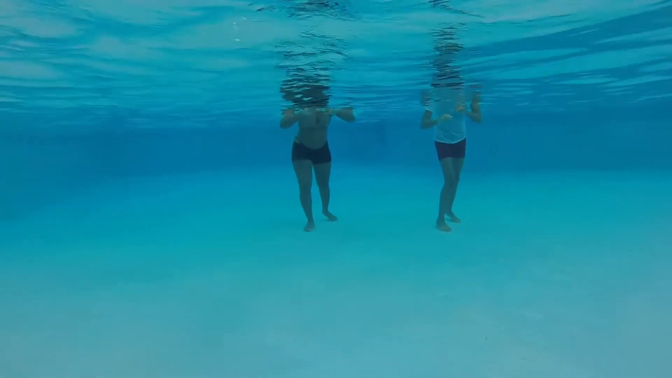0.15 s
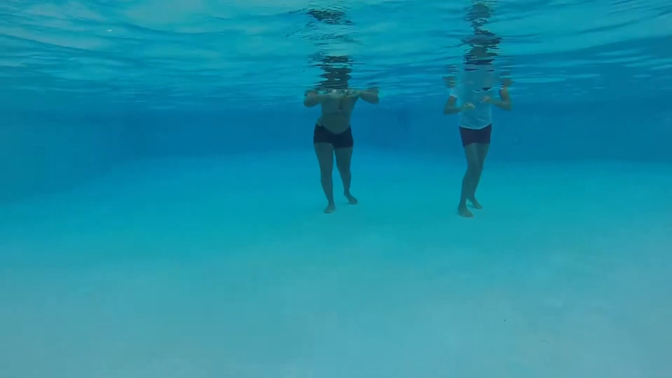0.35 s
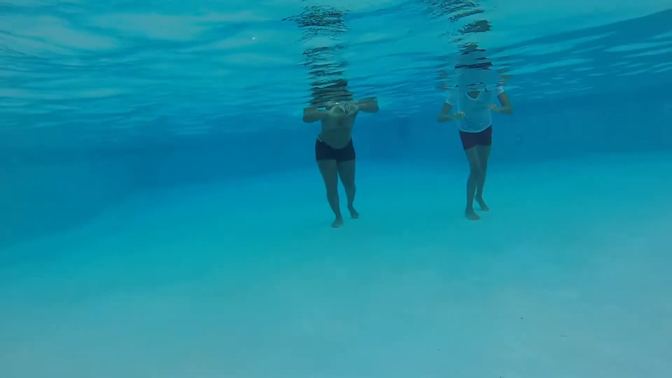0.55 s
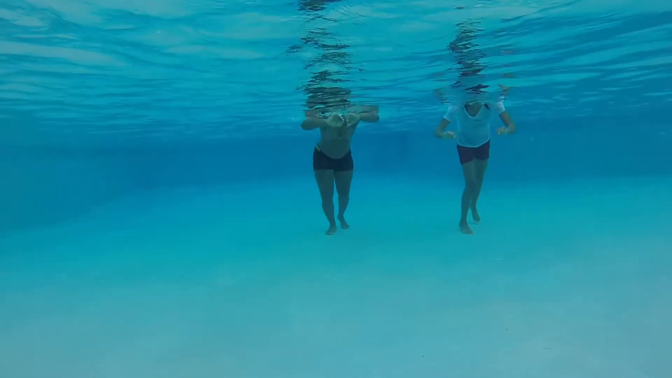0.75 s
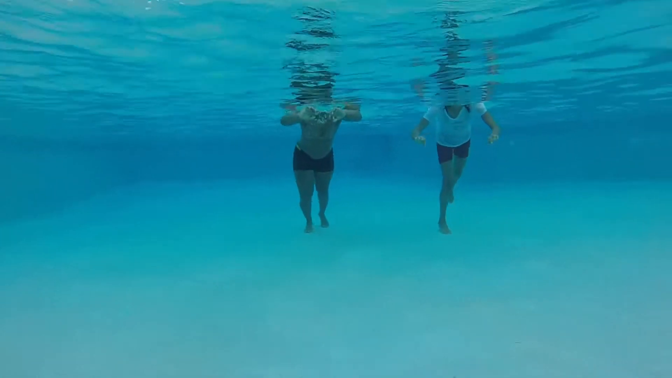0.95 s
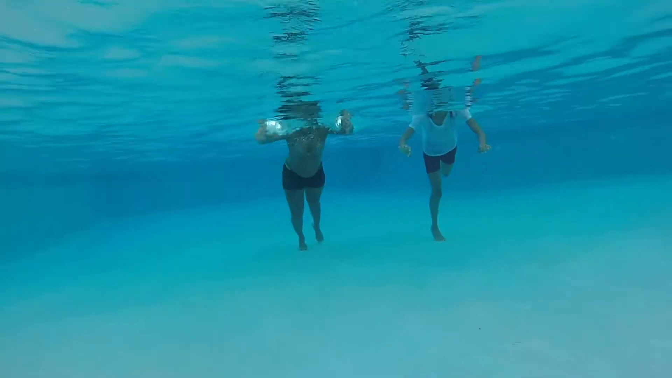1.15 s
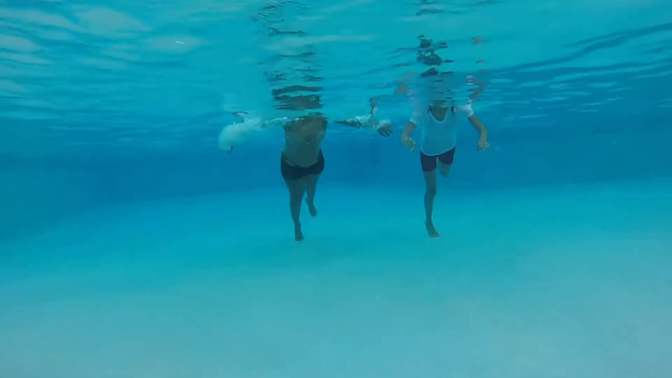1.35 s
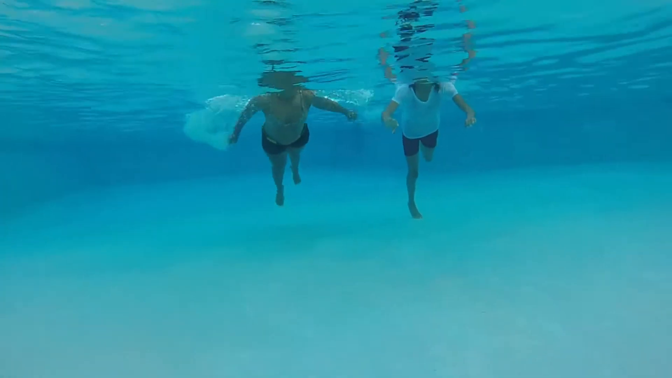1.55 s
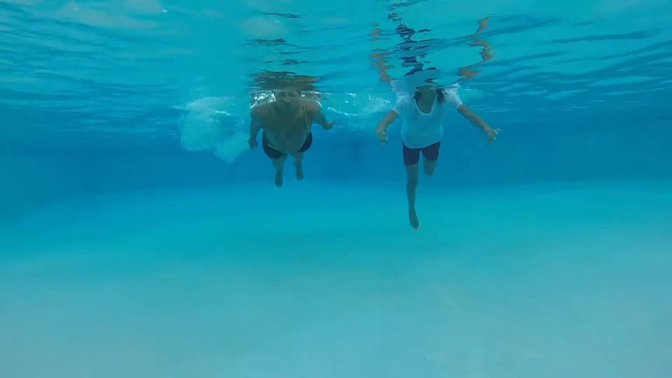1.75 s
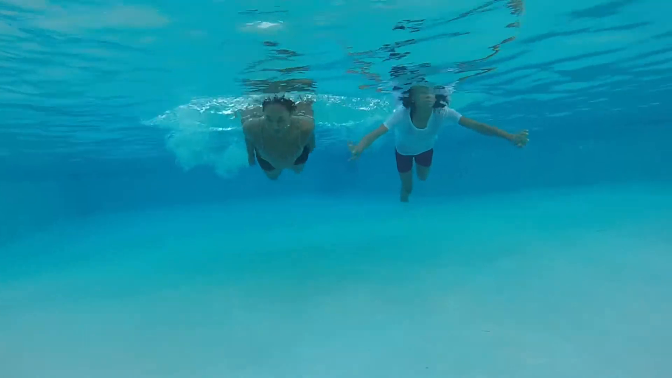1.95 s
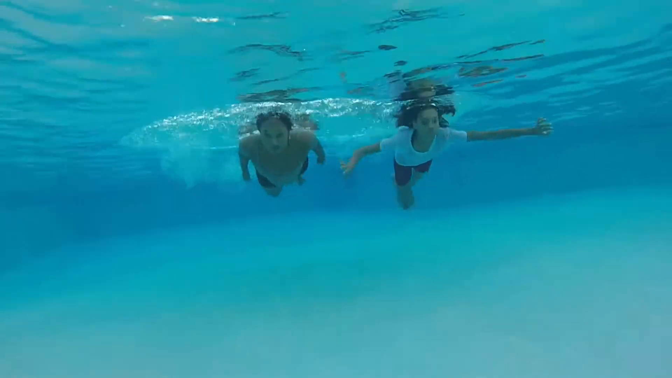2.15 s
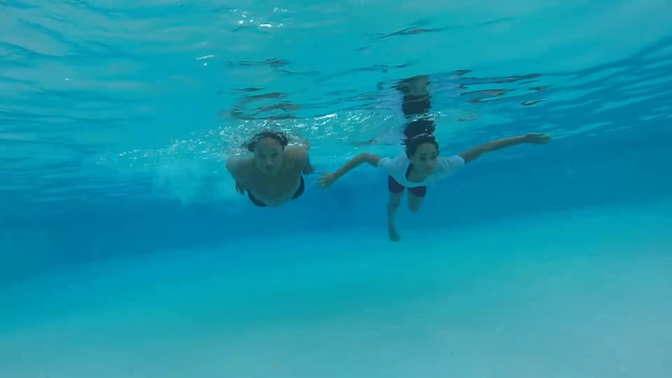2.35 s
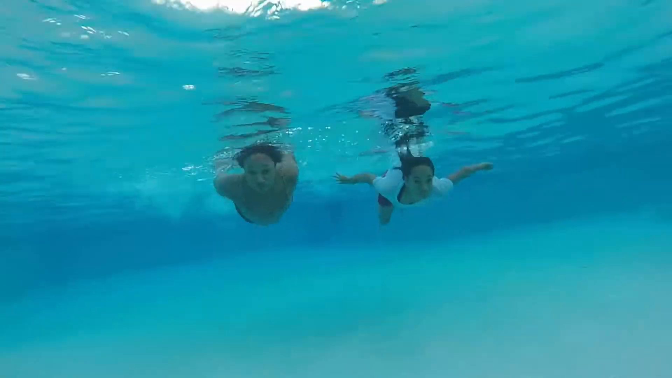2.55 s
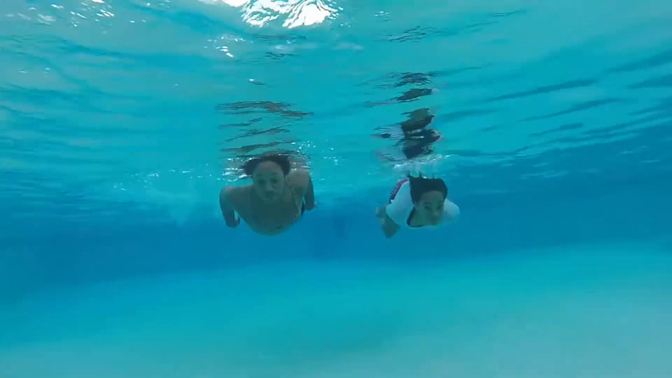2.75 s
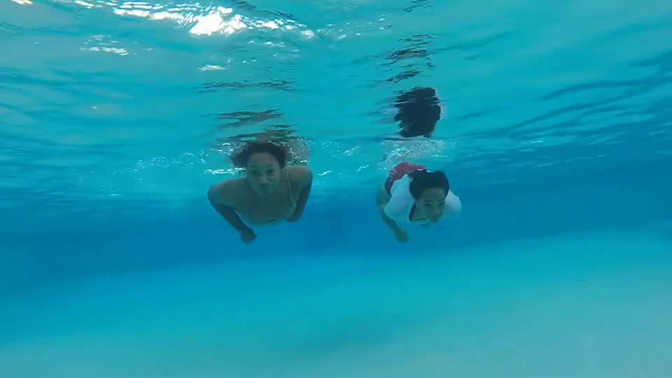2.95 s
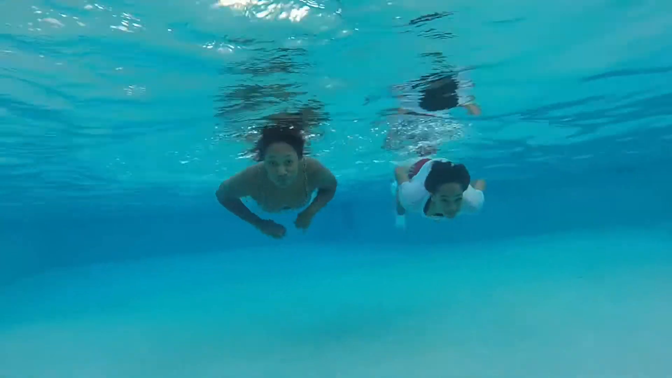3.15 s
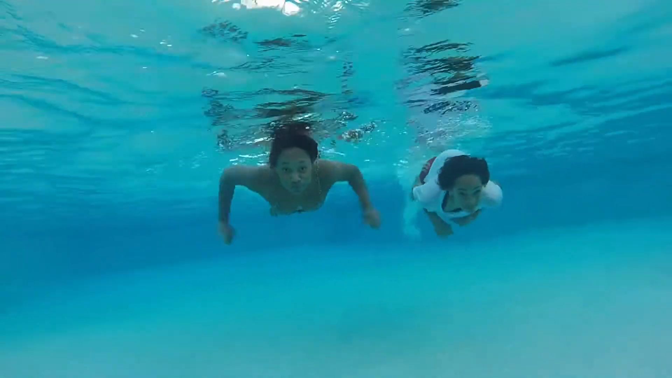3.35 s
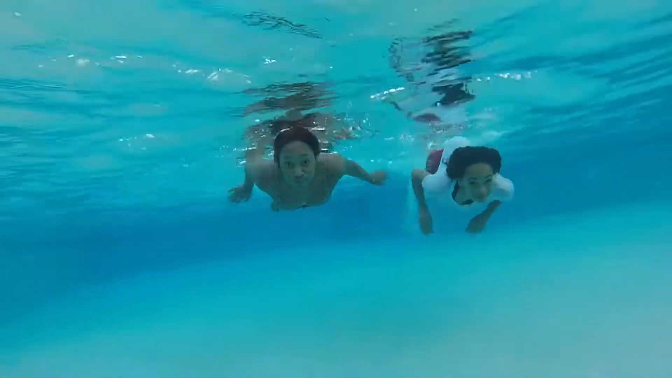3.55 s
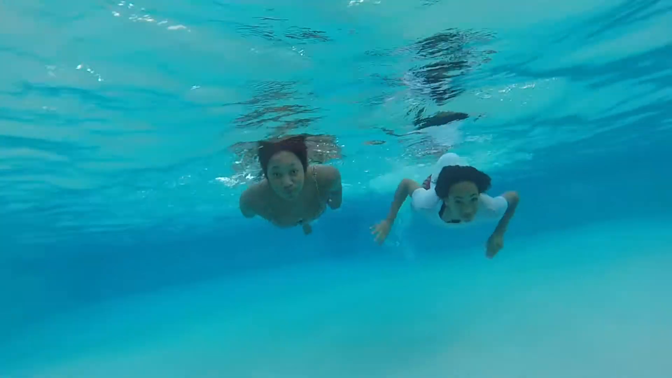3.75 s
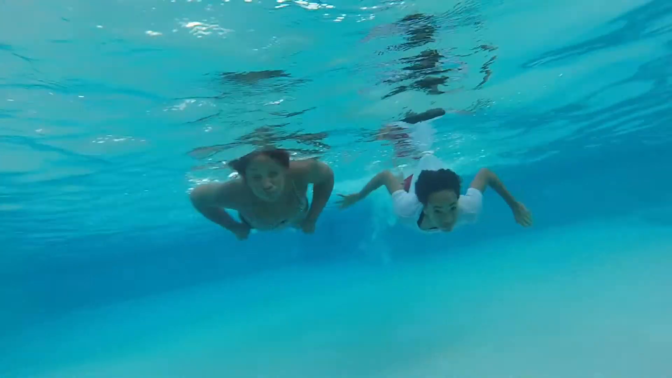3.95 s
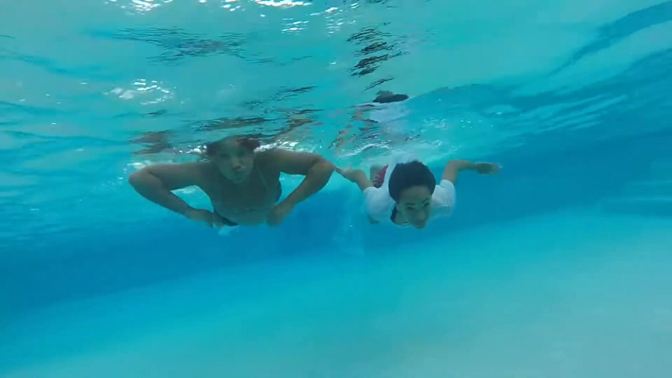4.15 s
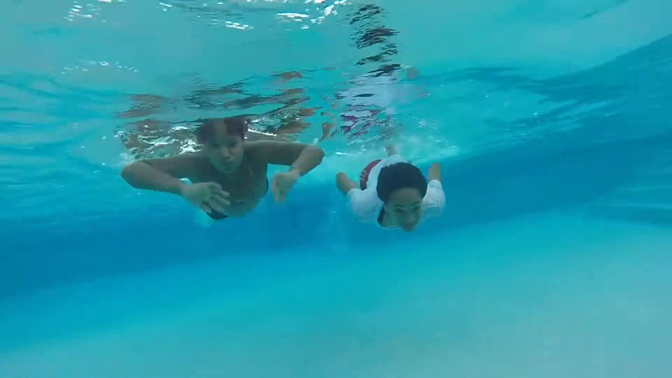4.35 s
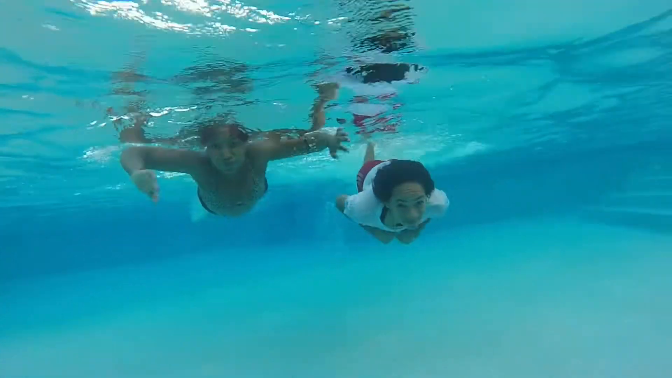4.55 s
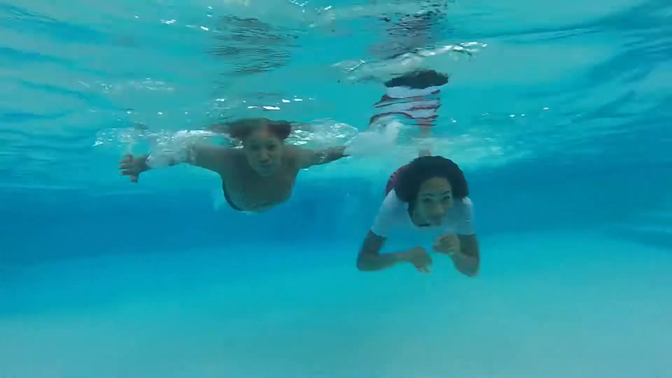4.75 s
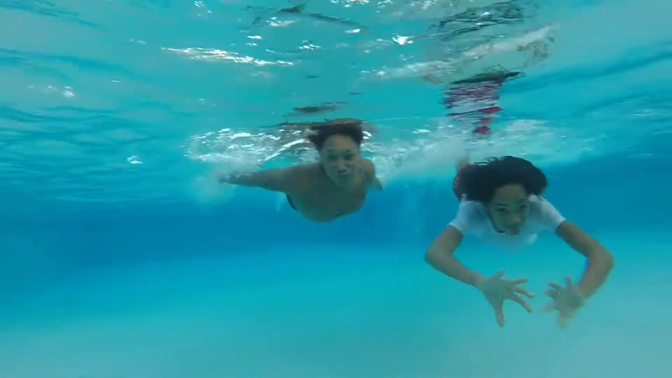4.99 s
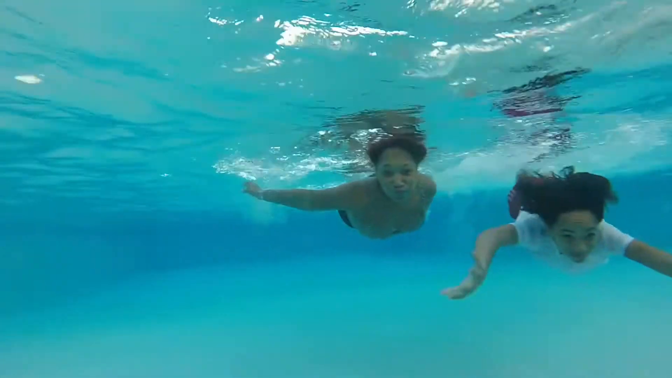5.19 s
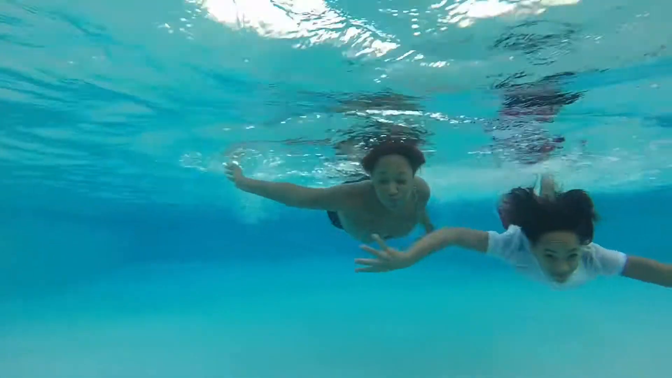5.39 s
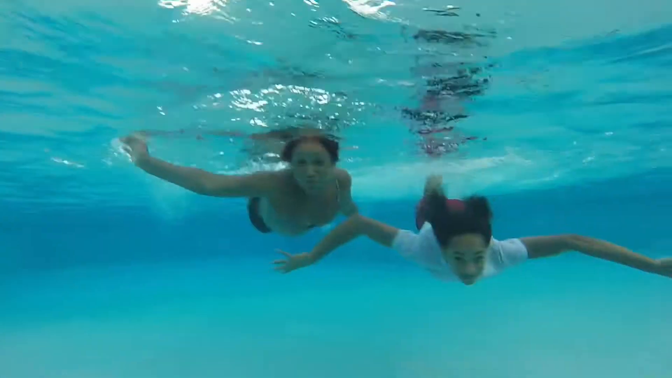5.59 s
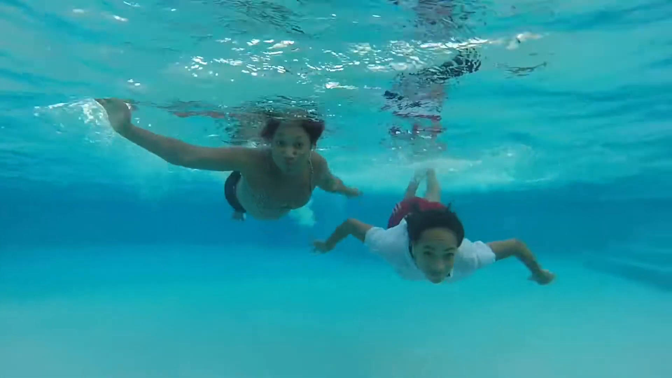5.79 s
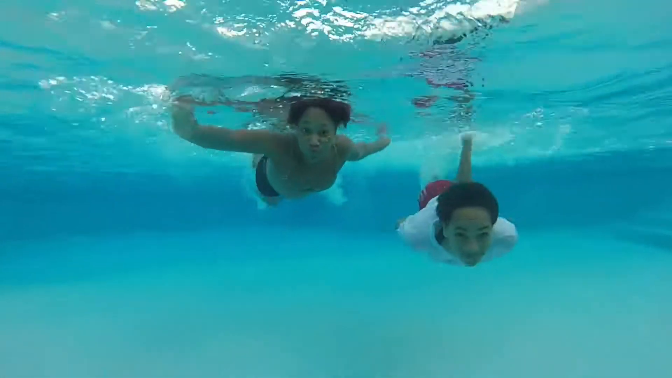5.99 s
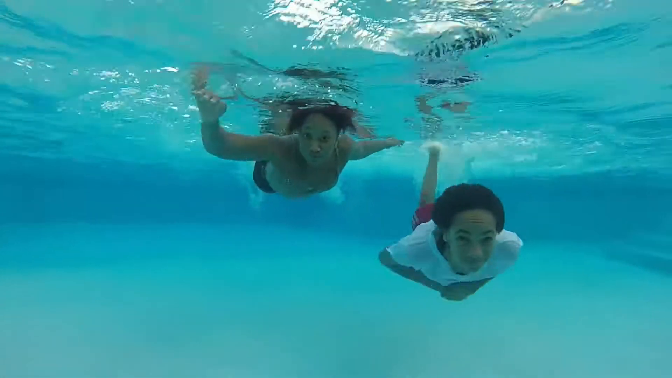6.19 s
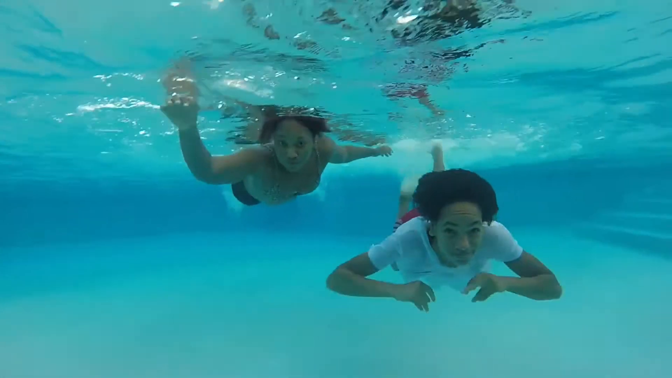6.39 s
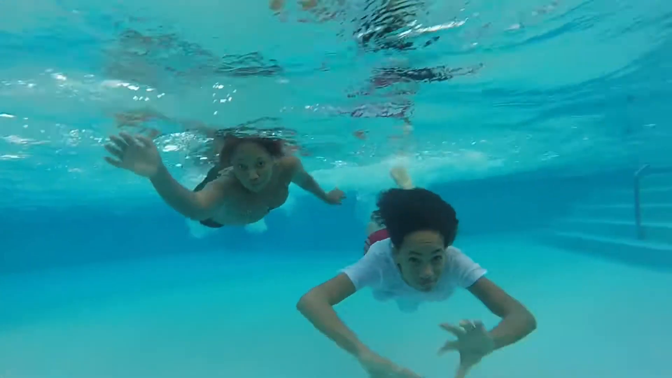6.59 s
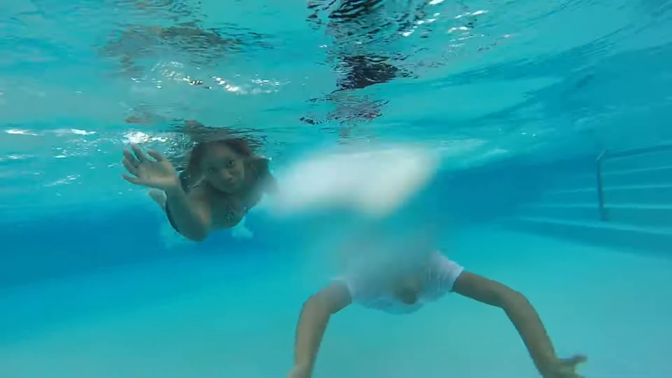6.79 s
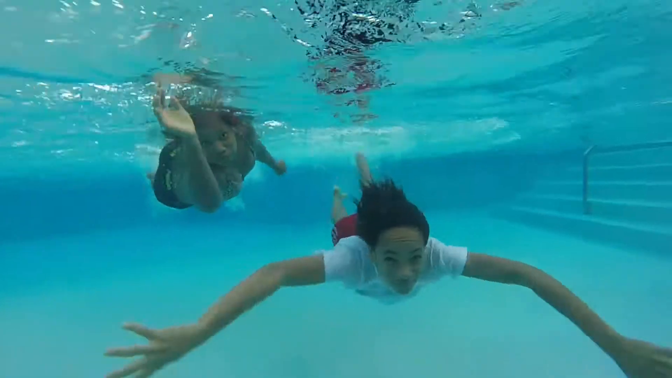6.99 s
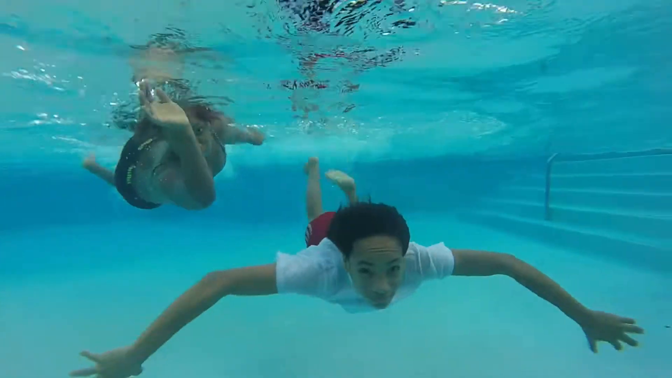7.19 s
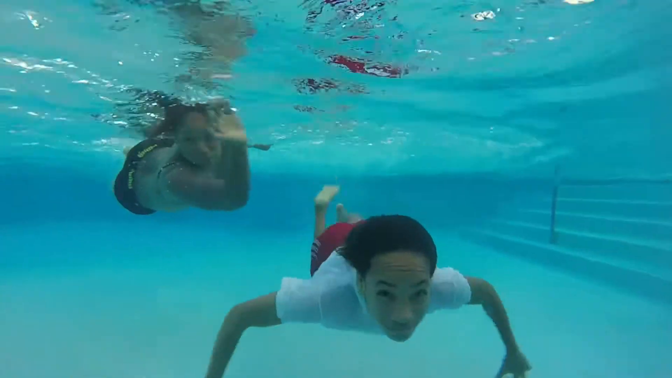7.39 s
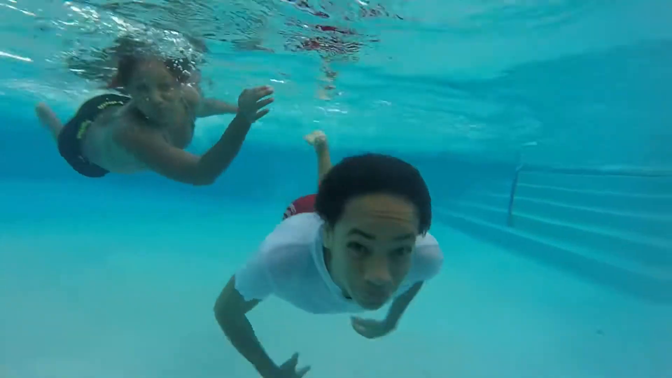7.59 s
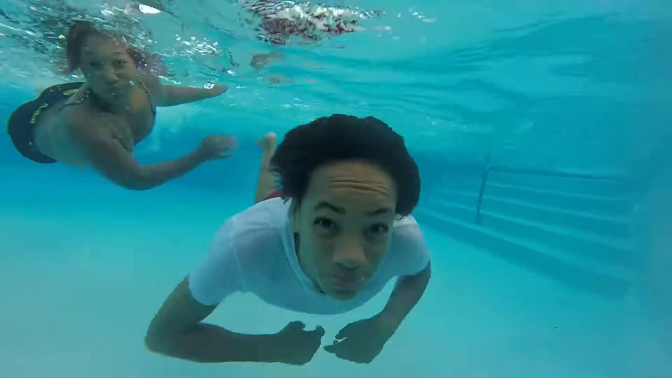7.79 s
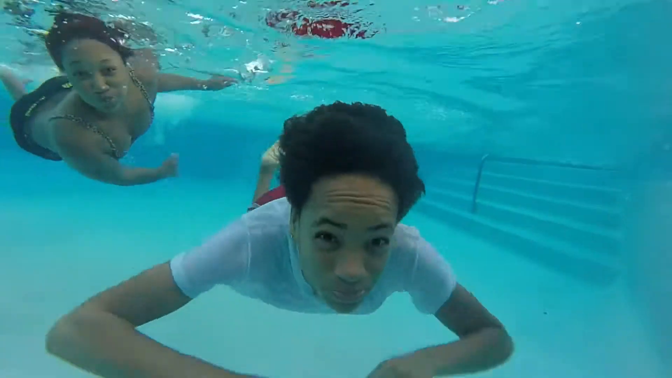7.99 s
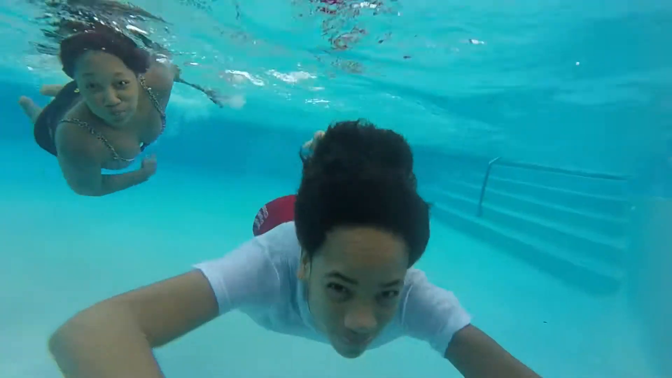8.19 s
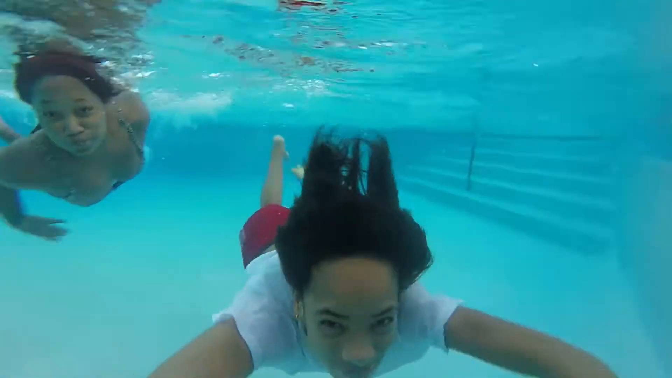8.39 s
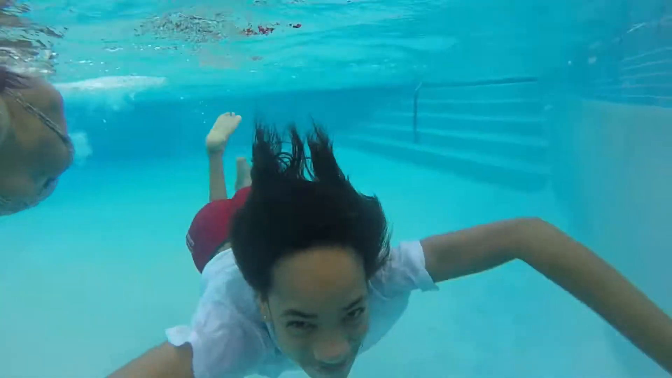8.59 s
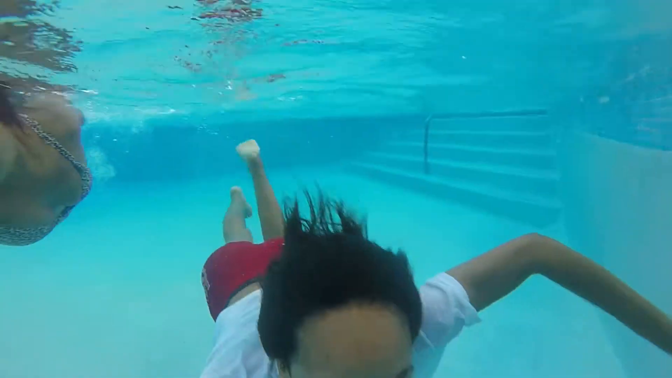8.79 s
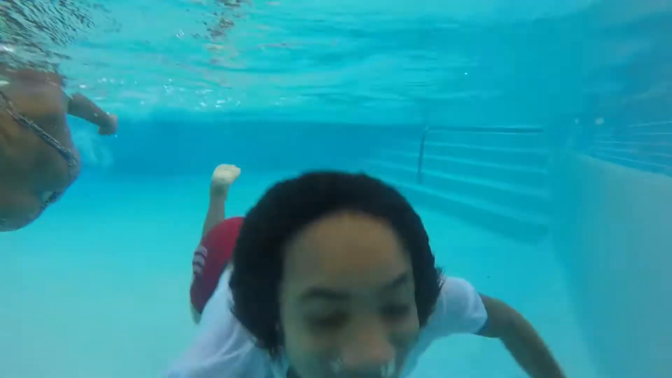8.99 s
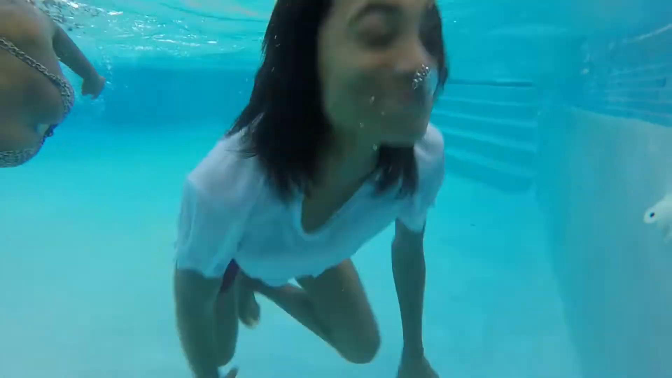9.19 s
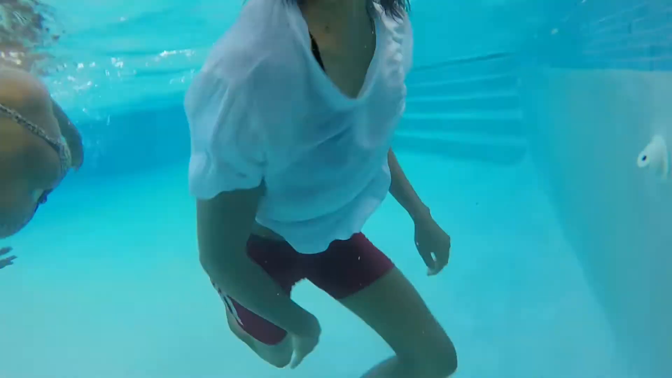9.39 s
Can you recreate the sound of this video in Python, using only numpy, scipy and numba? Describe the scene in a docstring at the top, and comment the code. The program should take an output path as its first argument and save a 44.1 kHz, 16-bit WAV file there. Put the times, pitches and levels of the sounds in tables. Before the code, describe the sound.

Two people push off and swim underwater toward a submerged, enclosed microphone. Quiet water gives way to a sudden bubbly whoosh, a brief lull, then pulsing churn with many round, hollow blurps. The fullest surge comes halfway through. Later, bubbles thin to separate gulps, bright patter and crackle, over a deep heave, dull thumps and occasional housing clicks.

```python
"""Clouds of large, medium and fine bubbles, churned by two swimmers diving and stroking toward a microphone under water.
The microphone sits in a sealed housing that colours the clouds with its resonances.
Bubbles are damped sines: clouds, single gulps and blurps of air, small plinks, a fine patter and crackle.
Splashes and ticks are shaped noise bursts; moving water gives low sine thumps and a noise heave and rumble, over hiss."""
import sys
import numpy as np
from scipy import signal
from scipy.fft import rfft, irfft
from scipy.io import wavfile
from scipy.ndimage import uniform_filter1d
from numba import njit

SR = 44100
rng = np.random.default_rng(int(sys.argv[2]) if len(sys.argv) > 2 else 0)


def waveform_to_disk(signal):
    """Save audio, clipped to [-1, 1], as 16-bit WAV at the path in sys.argv[1]."""
    frames = np.transpose(np.atleast_2d(signal))
    scaled = np.clip(frames, -1, 1) * 32767
    samples = np.round(scaled).astype(np.int16)
    wavfile.write(sys.argv[1], SR, samples)


N = 416304


def undb(db):
    """Gain of a level in dB."""
    return 10 ** (np.asarray(db) / 20)


def unit(x):
    """Scaled to rms 1."""
    return x / np.sqrt(np.mean(x ** 2))


def curve(time_s, values):
    """Straight lines between table points, one value a sample."""
    return np.interp(np.arange(N) / SR, time_s, values)


def noise(n=N):
    """White Gaussian noise."""
    return rng.standard_normal(n)


def band(x, lo_hz, hi_hz):
    """Butterworth band-pass."""
    return signal.sosfilt(signal.butter(3, [lo_hz, hi_hz], "bandpass", fs=SR, output="sos"), x)


def colour(x, points, modes=()):
    """Minimum-phase filter through (Hz, dB) points, lifted at (Hz, width Hz, dB) resonances."""
    size = 4096
    hz, db = np.transpose(points)
    bins_hz = np.arange(size // 2 + 1) * SR / size + 1  # +1 avoids log(0)
    gain_db = np.interp(np.log(bins_hz), np.log(hz), db)
    for mode_hz, width_hz, lift_db in modes:
        gain_db = gain_db + lift_db / (1 + (2 * (bins_hz - mode_hz) / width_hz) ** 2)
    # folding the cepstrum onto positive time makes the filter causal
    cepstrum = irfft(gain_db * np.log(10) / 20)
    cepstrum[1:size // 2] *= 2
    cepstrum[size // 2 + 1:] = 0
    impulse = irfft(np.exp(rfft(cepstrum)))
    return signal.fftconvolve(x, impulse)[:N]


def walk(rate_hz):
    """Random levels held for 1 / rate_hz and slewed; rms 1."""
    hold = int(SR / rate_hz)
    steps = np.repeat(noise(N // hold + 1), hold)
    return unit(uniform_filter1d(steps, hold // 2)[:N])


@njit
def rings(n, start_s, hz, t60_s, size, rise, glide):
    """Damped sines that swell over rise cycles; pitch shifts by the fraction glide as they fade."""
    out = np.zeros(n)
    for k in range(len(start_s)):
        first, length, phase = int(start_s[k] * SR), int(t60_s[k] * SR), 0.
        for j in range(min(length, n - first)):
            u = j / length
            phase += hz[k] * (1 + glide * u) / SR
            swell = min(phase / rise, 1.)
            out[first + j] += size[k] * swell * 10 ** (-3 * u) * np.sin(2 * np.pi * phase)
    return out


def struck(start_s, peak_db, hz, t60_s, rise, glide):
    """One ring an event, its start level raised to offset the decay during the swell."""
    t60_s = np.clip(t60_s, .004, .6) + 0 * start_s
    size = undb(peak_db + 60 * rise / (hz * t60_s))
    return rings(N, start_s, hz, t60_s, size, rise, glide)


def random_events(rate_per_s, columns):
    """Columns of random numbers 0-1, one row an event."""
    return rng.random((int(rate_per_s * N / SR), columns)).T


# Gain of the housing. Each row: frequency in Hz, gain in dB.
HOUSING_GAIN = [(180, -55.5), (300, -29), (404, -22.5), (530, -3.5), (641, -3.5), (800, -10), (968, -16.5),
                (1110, -32), (1620, -16.5), (1870, -25.5), (2140, -25.5), (2790, -20), (3810, -34.5),
                (5390, -35.5), (14300, -57), (15500, -78)]
# Panel resonances of the housing. Each row: frequency in Hz, width in Hz, lift in dB.
PANEL_MODES = [(643.4, 330, 6), (1498, 32, 3.5), (1876, 61, 9), (2022, 98, 6), (2235, 120, 6),
               (2688, 85, 3.5), (3265, 51, 3), (4320, 73, 8), (5490, 560, 7), (7500, 130, 6)]


def cloud(lo_hz, hi_hz, rate_per_s, cycles, spread_db, wash_db, surge_db):
    """Damped sines of random pitch over a noise wash of unresolved bubbles, through the housing."""
    when, size, strength = random_events(rate_per_s, 3)
    hz = lo_hz * (hi_hz / lo_hz) ** size
    # amplitude rises with pitch; a few bubbles are much stronger than the rest
    gain = hz * undb(-spread_db * np.log(1.02 - strength))
    pops = rings(N, when * N / SR, hz, 3 * cycles / hz, gain, 1.92, 0.052)
    wash = band(noise(), lo_hz, hi_hz)
    heard = colour(unit(pops) + undb(wash_db) * unit(wash), HOUSING_GAIN, PANEL_MODES)
    return unit(heard) * undb(surge_db * (walk(25) + 0.43 * walk(8)))


# Churn swelling with the strokes. Each row: time in seconds, large-bubble drive in dB,
# small-bubble drive in dB.
CHURN_DRIVE = [(0, -56, -59), (.12, -57, -53.5), (.3, -48, -49.5), (.47, -49.5, -52.5), (.8, -44.5, -51),
               (1.17, -42.5, -53), (1.23, -31, -44), (1.33, -31, -43), (1.38, -21.5, -36), (1.43, -23, -37),
               (1.53, -21, -35.5), (1.74, -28, -39), (1.86, -27, -45), (1.94, -25, -45), (2.0, -28, -43.5),
               (2.16, -30.5, -43), (2.36, -33.5, -50.5), (2.49, -43, -52.5), (2.57, -33, -42.5),
               (2.8, -31, -43.5), (2.92, -24.5, -42), (3.02, -29.5, -39), (3.26, -23, -37.5),
               (3.78, -27.5, -39.5), (4.27, -23, -36), (4.68, -25, -37.5), (4.84, -19.5, -35.5),
               (4.971, -13.5, -32), (5.03, -23, -38.5), (5.12, -20.5, -38), (5.41, -25, -40),
               (5.85, -25, -38.5), (6.25, -23.5, -38), (6.42, -25.5, -37), (6.58, -24.5, -36),
               (6.9, -31.5, -41), (7.47, -31.5, -36), (7.65, -27.5, -41), (7.9, -31.5, -41.5),
               (8.05, -22.5, -41.5), (8.2, -31.5, -41.5), (8.35, -28.5, -37.5), (8.52, -31.5, -41.5),
               (8.6, -40, -40.5), (8.91, -31.5, -36.5), (9.2, -30, -38.5), (9.44, -26, -39)]
# Bubble clouds. Each row: lowest pitch in Hz, highest pitch in Hz, bubbles per second,
# cycles per 20 dB of decay, size spread in dB, wash relative to bubbles in dB, surge scale in dB,
# share 0-1 of the large-bubble drive (the rest from the small), offset in dB.
BUBBLE_CLOUDS = [(307, 1090, 420, 6.25, 1.2, 1.5, 1.24, 0.98, 0.47),
                 (757, 1088, 120, 8.7, 4.4, -10, 2.9, 0.85, -12.5),
                 (1224, 2150, 600, 19.5, 3.1, -6, 0.92, 0.34, -3),
                 (2206, 3860, 650, 21, 3.6, -6, 0.54, 0.018, -1.44),
                 (3720, 15900, 450, 30, 4.2, 3.5, 1.43, 0.022, -10)]
# Narrowing of the main housing resonance. Each row: time in seconds, share 0-1 of the sharp band.
RESONANCE_FOCUS = [(1.5, 0.34), (4.8, 0.06), (6.6, 0.45), (9.44, 0.51)]
FOCUS_LO_HZ, FOCUS_HI_HZ = 579.4, 706


def churn():
    """Bubble clouds whose levels follow the strokes, with a shared random flicker."""
    time_s, large_db, small_db = np.transpose(CHURN_DRIVE)
    clouds = []
    for *settings, share, offset_db in BUBBLE_CLOUDS:
        drive_db = curve(time_s, share * large_db + (1 - share) * small_db)
        clouds.append(cloud(*settings) * undb(drive_db + offset_db))
    sharp = band(clouds[0], FOCUS_LO_HZ, FOCUS_HI_HZ)
    focus = np.clip(curve(*np.transpose(RESONANCE_FOCUS)), 0, 1)
    large = (1 - focus) * (clouds[0] + clouds[1]) + focus * undb(3.5) * sharp
    return (large + sum(clouds[2:])) * undb(1.04 * walk(18))


# Trapped air, mostly large. Each row: start in seconds, peak in dB, pitch in Hz, t60 in seconds.
AIR_GULPS = [(1.03, -34, 538, 0.58), (1.213, -32, 4520, 0.035), (1.374, -13.5, 647, 0.066),
             (1.524, -18, 650, 0.023), (1.654, -12.5, 660, 0.026), (2.068, -15.5, 700, 0.059),
             (2.115, -17.5, 689, .05), (2.214, -21, 606, 0.023), (2.261, -16.5, 595, 0.068),
             (2.371, -27, 640, 0.016), (2.726, -5.5, 592, 0.032), (3.088, -8, 550, 0.025),
             (3.192, -15.5, 587, 0.051), (3.235, -8.5, 628, 0.044), (3.282, -12.5, 664, 0.11),
             (3.445, -12, 563, 0.051), (3.472, -15, 660, 0.15), (3.704, -10, 645, 0.053),
             (3.958, -10.5, 665, 0.11), (4.208, -9, 643, 0.037), (4.257, -13, 630, 0.018),
             (4.417, -17.5, 570, 0.023), (4.47, -14, 617, 0.25), (4.71, -8, 648, 0.052),
             (4.724, -3.5, 613, 0.045), (4.892, -3.5, 594, 0.061), (4.938, -8, 570, 0.026),
             (5.254, -11, 564, 0.022), (5.388, -12.5, 696, 0.016), (5.475, -14.5, 606, 0.062),
             (5.65, -8, 626, 0.021), (6.093, -29, 630, 0.026), (6.137, -8.5, 610, 0.07),
             (6.175, -12.5, 620, 0.046), (6.364, -10, 617, 0.09), (6.47, -18, 620, 0.035),
             (6.991, -22.5, 616, 0.17), (7.125, -19, 607, 0.025), (7.223, -16.5, 634, 0.061),
             (7.651, -11, 608, 0.069), (7.684, -13, 632, 0.11), (7.953, -20, 652, 0.099),
             (7.973, -11, 613.4, 0.15), (8.003, -5, 624, 0.052), (8.131, -2.5, 580, 0.026),
             (8.452, -7.5, 2740, 0.017), (8.657, -20, 610, 0.029), (8.739, -24.5, 617, 0.012),
             (8.811, -27, 615, 0.0083), (8.925, -11.5, 670, 0.047), (8.97, -20, 740, 0.019),
             (8.971, -23.5, 990, 0.041), (9.092, -15.5, 700, 0.014), (9.13, -9.5, 618, 0.084)]


def gulps():
    """Each gulp is one bubble: a damped sine that rises slightly in pitch."""
    return struck(*np.transpose(AIR_GULPS), rise=3.17, glide=0.012)


# Deeper pockets of air. Each row: start in seconds, peak in dB, starting pitch in Hz.
AIR_BLURPS = [(6.399, -18, 548), (7.629, -17.5, 563), (8.138, -15, 394), (8.153, -15.5, 498),
              (8.17, -14, 534), (8.177, -15, 546), (8.769, -19.5, 496), (9.011, -27, 450),
              (9.052, -18, 558), (9.069, -24.5, 453), (9.28, -17, 578), (9.363, -20.5, 393),
              (9.388, -12.5, 597)]
BLURP_T60_S = 0.086


def blurps():
    """Damped sines that sag in pitch as they fade."""
    return struck(*np.transpose(AIR_BLURPS), BLURP_T60_S, rise=0.59, glide=-0.041)


# Small bubbles. Each row: start in seconds, peak in dB, pitch in Hz.
SMALL_BUBBLES = [(0.1451, -24.5, 2660), (0.176, -25.5, 2580), (0.2627, -32.5, 2780), (0.34, -29, 3200),
                 (0.3516, -32, 2640), (0.6078, -33, 1850), (0.64, -27, 1820), (0.6887, -33, 1830),
                 (0.6863, -40, 2690), (0.7926, -33, 2610), (0.824, -22, 1660), (0.964, -32.5, 1860),
                 (1.256, -20, 1870), (1.43, -22, 2290), (1.491, -15, 1850), (1.533, -20, 2310),
                 (2.554, -26, 1640), (2.7125, -25.5, 1710), (3.203, -23, 1640), (3.4766, -20.5, 1620),
                 (3.704, -19.5, 1620), (4.209, -21, 1860), (4.276, -18, 1660), (4.47, -19, 1890),
                 (4.707, -22, 1920), (4.7762, -17, 1870), (4.8396, -17.5, 1950), (5.5448, -23, 2000),
                 (5.82, -15, 1905), (5.9051, -24, 1510), (6.127, -22.5, 2670), (6.1386, -15, 1710),
                 (6.3226, -27, 2120), (6.3644, -10.5, 1660), (6.3972, -18, 1680), (6.4084, -22, 2120),
                 (6.4834, -22, 2690), (6.503, -22, 2170), (6.5284, -22, 3020), (6.5784, -21.5, 2730),
                 (6.9873, -20.5, 2200), (7.2444, -24, 1410), (7.571, -24, 1650), (7.9668, -24, 1860),
                 (8.1449, -35, 5260), (8.1723, -35, 5620), (8.2043, -35, 5630), (8.211, -25, 2520),
                 (8.2366, -22, 2530), (8.3125, -30, 1530), (8.3306, -21.5, 2830), (8.343, -25, 2750),
                 (8.3573, -21.5, 2630), (8.4107, -27, 2800), (8.444, -24, 3450), (8.4522, -10.5, 2360),
                 (8.6652, -15.5, 2260), (8.68, -19, 1890), (8.7046, -33, 5130), (8.7111, -24, 2000),
                 (8.712, -32, 3900), (8.741, -13, 2010), (8.7468, -14, 2830), (8.776, -18, 1500),
                 (8.815, -15, 1650), (8.813, -16, 2610), (8.8164, -26, 5400), (8.91, -22, 2680)]
PLINK_CYCLES = 62  # cycles per 60 dB of decay


def plinks():
    """Each small bubble is followed within 7 ms by two weaker ones of other sizes."""
    start_s, peak_db, hz = np.transpose(SMALL_BUBBLES)
    t60_s = PLINK_CYCLES / hz
    out = struck(start_s, peak_db, hz, t60_s, rise=3.1, glide=0.015)
    for _ in range(2):
        late, size = rng.random((2, len(start_s)))
        follower_hz = hz * (0.903 + 0.376 * size)
        out += struck(start_s + .007 * late, peak_db - 14.0, follower_hz, 1.7 * t60_s, rise=3.4, glide=0.066)
    return out


# Strokes close by. Each row: start in seconds, burst peak before colouring in dB.
STROKE_SPLASHES = [(3.694, -14), (3.954, -14.5), (4.206, -25), (4.709, -15), (5.636, -27), (5.812, -17.5),
                   (6.131, -13), (6.358, -11.5), (6.396, -20.5), (8.657, -17), (8.739, -19), (8.81, -19.5),
                   (9.389, -17)]
# Splash colour. Each row: frequency in Hz, gain in dB.
SPLASH_GAIN = [(150, -1), (380, -9.5), (640, 17), (1150, -8.5), (1650, -0.5), (2800, -1.5)]
SPLASH_T60_S = 0.1


def splashes():
    """Slapped water: noise bursts that swell over milliseconds, then take on their own colour, peaked near 640
    Hz."""
    out, t = np.zeros(N), np.arange(SR // 5) / SR
    for start_s, peak_db in STROKE_SPLASHES:
        envelope = (1 - np.exp(-t / 0.0033)) * undb(-60 * t / SPLASH_T60_S)
        burst = band(noise(len(t)), 54.0, 2120.0) * envelope
        burst *= undb(peak_db) / np.abs(burst).max()
        i = int(start_s * SR)
        out[i:i + len(t)] += burst[:N - i]
    return colour(out, SPLASH_GAIN)


# Displaced water. Each row: start in seconds, peak in dB, starting pitch in Hz.
WATER_THUMPS = [(3.699, -19, 127), (3.722, -26, 170), (3.938, -27, 100), (3.96, -30, 106), (4.0, -21, 145),
                (4.212, -13.5, 144), (4.231, -19, 168), (4.823, -28, 210), (5.135, -23, 153),
                (5.631, -19.5, 111), (5.677, -6, 41.3), (5.704, -15, 20.9), (5.779, -21.5, 75),
                (5.905, -20.5, 108), (6.371, -24.5, 124), (6.367, -27, 40), (8.307, -18.5, 39.7),
                (8.516, -23, 96), (8.619, -27, 40), (8.802, -23, 129), (9.048, -22.5, 109),
                (9.379, -26.5, 89)]
THUMP_T60_S_AT_100_HZ = 0.079


def thumps():
    """Low damped sines that sag in pitch; deeper ones last longer."""
    start_s, peak_db, hz = np.transpose(WATER_THUMPS)
    t60_s = THUMP_T60_S_AT_100_HZ * np.sqrt(100 / hz)
    return struck(start_s, peak_db, hz, t60_s, rise=0.66, glide=-0.048)


# Ticks on the housing. Each row: start in seconds, body peak in dB, centre in Hz, t60 in seconds,
# snap relative to body in dB.
HOUSING_TICKS = [(0.822, -28, 2750, 0.017, -30), (1.157, -15, 3420, 0.036, -31),
                 (2.3707, -21, 2700, 0.01, -11.5), (7.467, -15.5, 6260, 0.022, 1),
                 (7.486, -39, 5000, 0.05, 9), (7.945, -7, 3900, 0.017, -12.5), (8.656, -29, 2600, .02, -17),
                 (9.256, -18, 3180, 0.017, -28)]


def ticks():
    """Short decaying noise around each centre, with a brighter snap on top."""
    out, t = np.zeros(N), np.arange(SR // 10) / SR
    for start_s, peak_db, hz, t60_s, snap_db in HOUSING_TICKS:
        burst = noise(len(t)) * 10 ** (-3 * t / t60_s)
        body = band(burst, 0.4 * hz, 1.274 * hz)
        snap = band(burst, 5000.0, 11100.0)
        tick = body / np.abs(body).max() + undb(snap_db) * snap / np.abs(snap).max()
        i = int(start_s * SR)
        out[i:i + len(t)] += undb(peak_db) * tick
    return out


# Tiny bubbles bursting against the housing. Each row: time in seconds, level in dB.
PATTER_LEVEL = [(0, -58), (.3, -50), (.84, -50.5), (.9, -69), (1.3, -36), (1.7, -50), (2.4, -63),
                (6.1, -50), (6.5, -41), (7.9, -57), (8.33, -39), (8.5, -54), (8.75, -52), (9.44, -53)]
# Panels they ring. Each row: frequency in Hz, relative level in dB.
PATTER_PANELS = [(1870, -0.5), (2680, 0.5), (3190, -1)]
PATTER_PER_S, PATTER_T60_S, PATTER_SPREAD_DB = 220, 0.035, 3.0


def patter():
    """Each burst rings one housing panel slightly off pitch; the level rises in flurries."""
    when, panel, detune, strength = random_events(PATTER_PER_S, 4)
    hz, db = np.array(PATTER_PANELS)[(panel * len(PATTER_PANELS)).astype(int)].T
    db = db - PATTER_SPREAD_DB * np.log(1.02 - strength)
    hz = hz * (1 + 0.077 * (detune - .5))
    out = struck(when * N / SR, db, hz, PATTER_T60_S, rise=5.4, glide=0.0064)
    return unit(out) * undb(curve(*np.transpose(PATTER_LEVEL)) + 2.5 * walk(12))


# Fine spray in flurries. Each row: time in seconds, level in dB.
CRACKLE_LEVEL = [(0, -66), (1.5, -68), (2.6, -55.5), (4.8, -66.5), (6.9, -66.5), (7.5, -60), (7.8, -63),
                 (8.33, -57), (8.55, -59), (8.74, -49.5), (9.0, -67), (9.3, -55), (9.44, -52)]
CRACKLE_PER_S, CRACKLE_CYCLES = 110, 38  # cycles per 60 dB of decay
CRACKLE_SPREAD_DB, CRACKLE_TILT_DB_PER_OCTAVE = 4, -9.5


def crackle():
    """Tiny bright bubbles from 4 to 14 kHz, each a few milliseconds long."""
    when, size, strength = random_events(CRACKLE_PER_S, 3)
    hz = 4000 * 3.5 ** size
    db = CRACKLE_TILT_DB_PER_OCTAVE * np.log2(hz / 4000) - CRACKLE_SPREAD_DB * np.log(1.02 - strength)
    out = struck(when * N / SR, db, hz, CRACKLE_CYCLES / hz, rise=1.5, glide=0.05)
    return unit(out) * undb(curve(*np.transpose(CRACKLE_LEVEL)) + 3.3 * walk(8.2))


# Water pushing on the housing. Each row: time in seconds, heave level in dB, rumble level in dB.
FLOW_LEVELS = [(0.0, -45, -45), (0.68, -53.5, -45), (1.79, -40.5, -43.5), (2.26, -53.5, -45.5),
               (3.94, -36, -40.5), (4.1, -43.5, -44), (5.49, -39.5, -40.5), (5.71, -33, -35),
               (5.83, -33.5, -40), (6.94, -37, -42), (7.26, -22, -46), (7.36, -29, -44),
               (7.52, -29.5, -40.5), (7.85, -25.5, -40.5), (8.28, -32, -40), (9.1, -33, -39),
               (9.44, -39, -36.5)]
# Rumble spectrum. Each row: frequency in Hz, relative density in dB per Hz.
RUMBLE_SPECTRUM = [(20, -12), (44, 2.5), (143, -3.5), (375, -12), (450, -11.5), (580, -57.5)]


def flow():
    """Pressure on the housing: a slow noise heave and a dark, unsteady rumble."""
    time_s, heave_db, rumble_db = np.transpose(FLOW_LEVELS)
    heave = unit(band(noise(), 8.5, 29.7)) * undb(curve(time_s, heave_db))
    rumble = unit(band(colour(noise(), RUMBLE_SPECTRUM), 40.4, 900.))
    return heave + rumble * undb(curve(time_s, rumble_db) + 2.0 * walk(14))


# Microphone noise. Each row: frequency in Hz, relative density in dB per Hz.
HISS_SPECTRUM = [(200, -0.5), (1000, -5), (4000, -15.5), (9000, -25.5), (15500, -35.5)]
HISS_DB = -47


def hiss():
    """Steady coloured microphone noise."""
    return unit(colour(noise(), HISS_SPECTRUM)) * undb(HISS_DB)


def scene():
    """All sources summed at one microphone."""
    bubbles = churn() + gulps() + blurps() + plinks() + patter() + crackle()
    water = splashes() + thumps() + flow()
    return (bubbles + water + ticks() + hiss())[None]


TOP_HZ = 15500


def record(dry):
    """Steep elliptic low-pass removes the top."""
    return signal.sosfilt(signal.ellip(10, .2, 80, TOP_HZ, fs=SR, output="sos"), dry)


dry = scene()
out = record(dry)
waveform_to_disk(out)
```